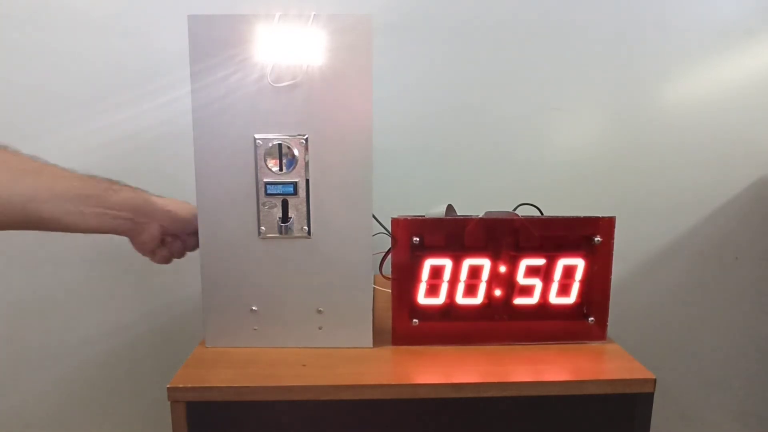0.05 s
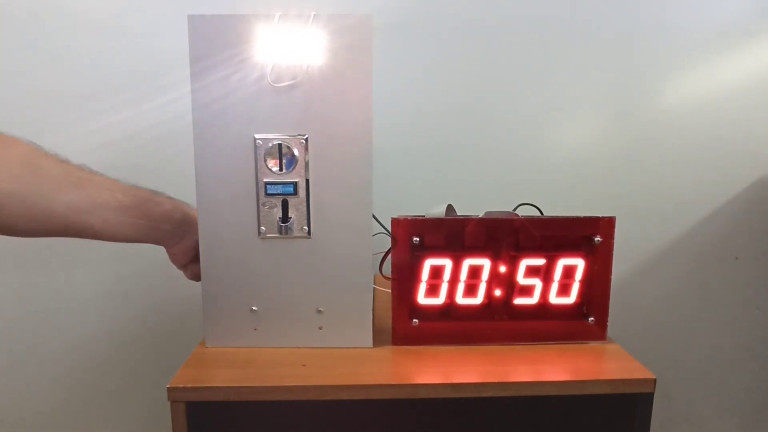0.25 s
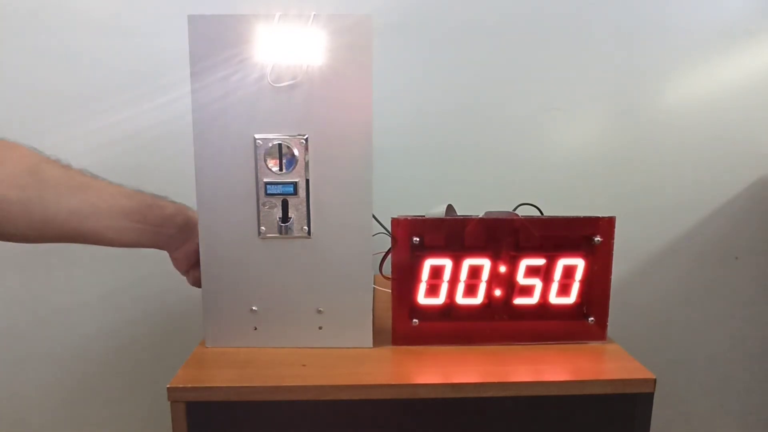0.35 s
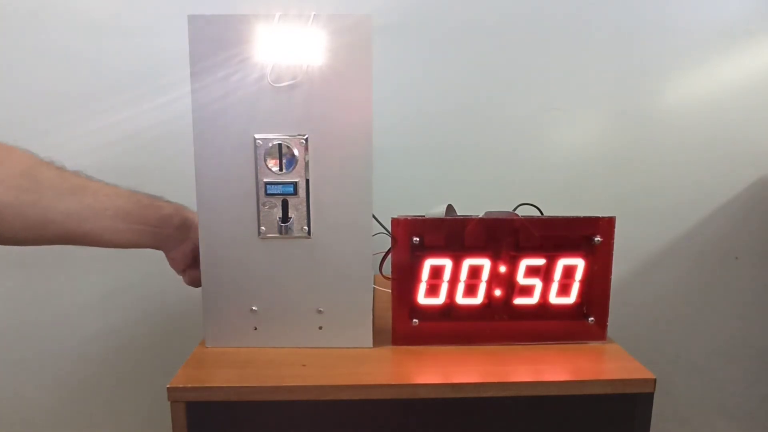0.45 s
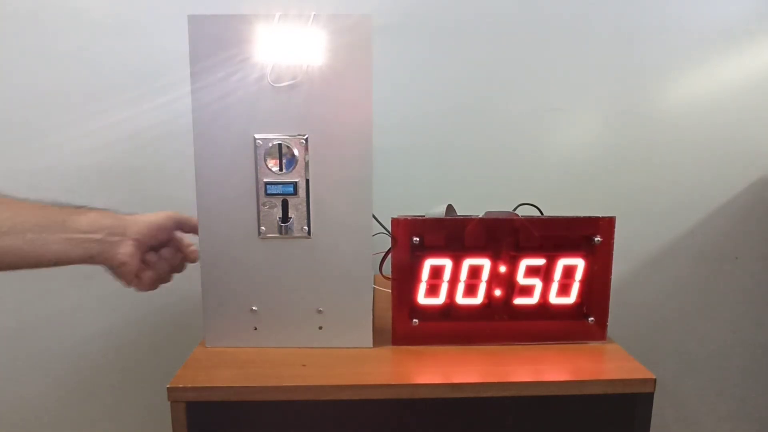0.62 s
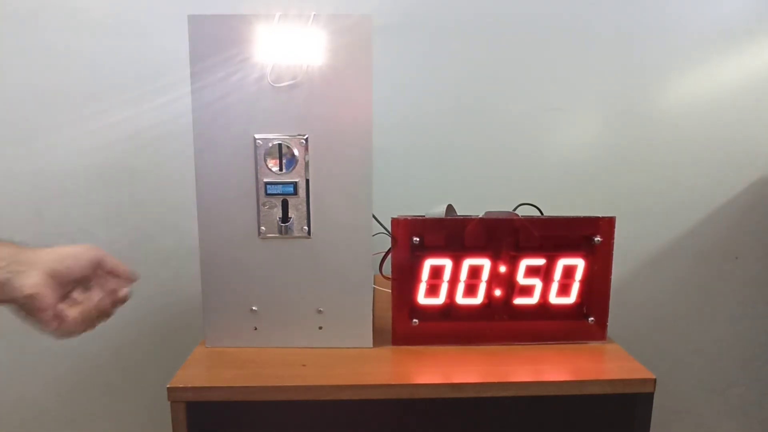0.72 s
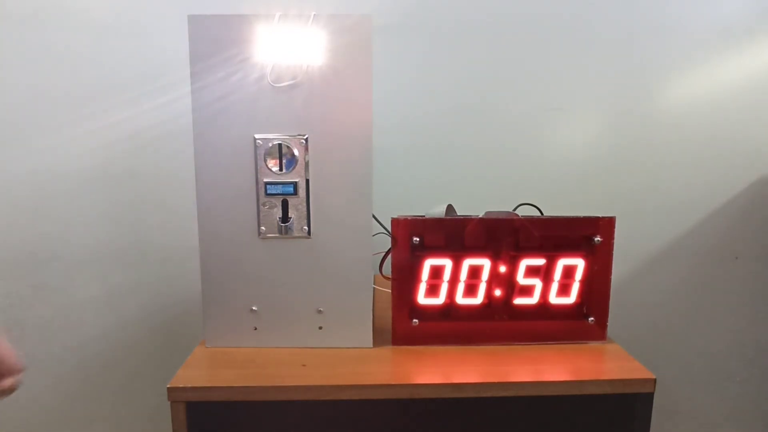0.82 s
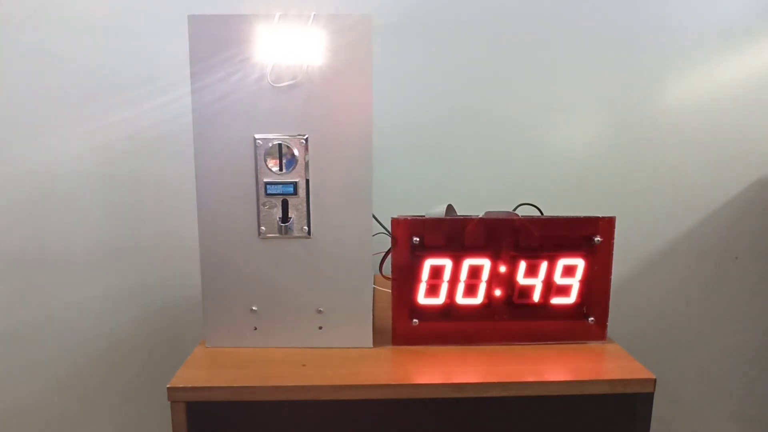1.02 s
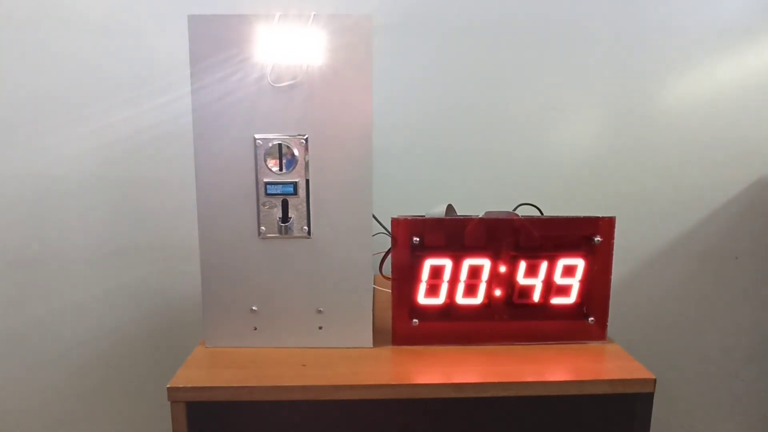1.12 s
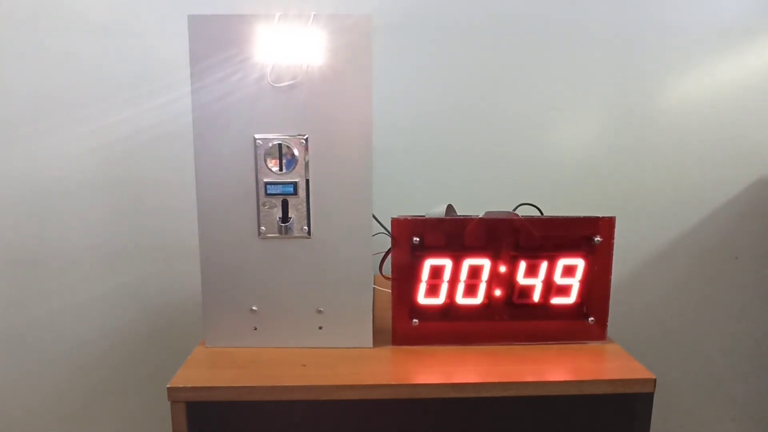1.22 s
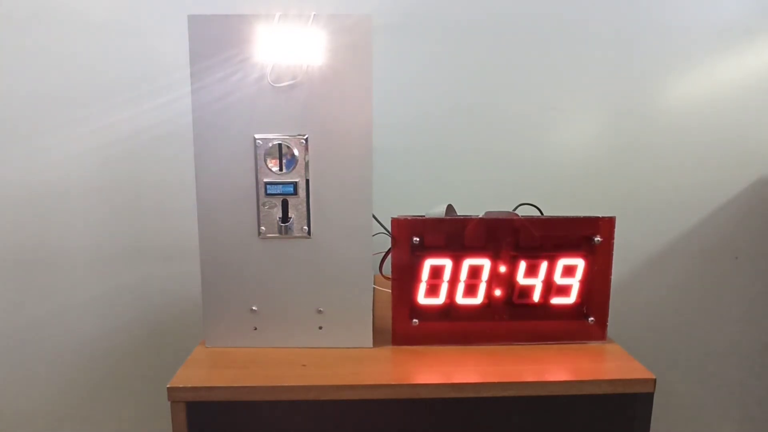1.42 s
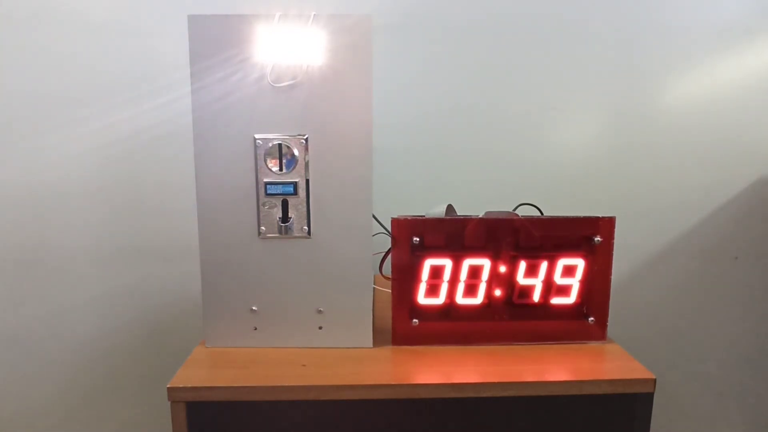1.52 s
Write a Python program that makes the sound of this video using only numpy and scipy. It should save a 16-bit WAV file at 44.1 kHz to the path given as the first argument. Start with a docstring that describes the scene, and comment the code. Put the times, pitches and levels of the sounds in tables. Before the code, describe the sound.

Two rattling bumps on a coin machine's metal panel, followed by clicks over ventilation hum.

```python
"""Ventilation rumble, hum and hiss fill a small hard room throughout.
At 0.24 s and 0.38 s a hand bumps a coin machine's sheet-metal panel: it booms, loose parts rattle,
and it ticks as the hand leaves. Near 1 s the coin mechanism gives one sharp click, ringing its body
and two small steel parts; light ticks and faint sliding follow.
The microphone is nearly deaf around 10 kHz."""
import sys
import numpy as np
from scipy import signal
from scipy.fft import rfft, irfft
from scipy.io import wavfile

SR = 44100
rng = np.random.default_rng(int(sys.argv[2]) if len(sys.argv) > 2 else 0)


def write(x):
    x = np.atleast_2d(x).T
    wavfile.write(sys.argv[1], SR, np.round(np.clip(x, -1, 1) * 32767).astype(np.int16))


N = 68355
T = np.arange(N) / SR
HZ = np.maximum(np.arange(N // 2 + 1) * SR / N, 1)


def from_db(db):
    """Decibels to gain."""
    return 10 ** (np.asarray(db) / 20)


def at_hz(points, hz):
    """Table lookup on a log-frequency axis."""
    points_hz, values = np.transpose(points)
    return np.interp(np.log(hz), np.log(points_hz), values)


def unit_energy(x):
    """Energy 1 per channel."""
    return x / np.sqrt(np.sum(x ** 2, axis=-1, keepdims=True) + 1e-20)


def decay(t60_s):
    """Exponential envelope."""
    return from_db(-60 * T / t60_s)


def impulses(t_s, db):
    """One impulse per event."""
    out = np.zeros(N)
    np.add.at(out, np.clip((np.asarray(t_s) * SR).astype(int), 0, N - 1), from_db(db))
    return out


def convolve(x, response):
    """Signal through an impulse response."""
    return signal.fftconvolve(np.atleast_2d(x), np.atleast_2d(response), axes=-1)[:, :N]


def butter(x, order, hz, kind):
    """Butterworth filter."""
    return signal.sosfilt(signal.butter(order, hz, kind, fs=SR, output="sos"), x + 1e-18)


def ring(modes):
    """Impulse response of damped modes, signs alternating."""
    return sum((-1) ** k * from_db(db) * decay(t60_s) * np.sin(2 * np.pi * hz * T)
               for k, (hz, db, t60_s) in enumerate(modes))


# Sound field: f/Hz, left-right correlation
COHERENCE = [(100, .98), (250, 0.91), (500, 0.63), (1000, 0.1), (2500, 0.096), (6000, 0.02)]
def noise(spectrum):
    """Coloured stereo noise, rms 1, alike in both ears in the bass."""
    mid, side = rfft(rng.standard_normal((2, N)))
    alike = at_hz(COHERENCE, HZ)
    ears = np.sqrt(1 + alike) * mid + np.sqrt(1 - alike) * side * np.array([[1], [-1]])
    return np.sqrt(N) * unit_energy(irfft(ears * from_db(at_hz(spectrum, HZ)), N))


# Air rumble: f/Hz, relative density/dB
RUMBLE_SPECTRUM = [(20, -27), (40, -28), (62, -2), (85, 0.5), (125, -9), (200, -5), (310, -12.5), (400, -8),
                   (520, -19), (680, -16.5), (1050, -27.5), (2200, -32.5), (8000, -45), (12000, -73)]
# Hiss: f/Hz, relative density/dB
HISS_SPECTRUM = [(2000, -26.5), (4200, 5), (5300, -17.5), (7000, 6.5), (8400, -4.5), (10000, 0),
                 (12300, -2.5), (16000, -3.5)]
# Hum: f/Hz, level/dB
HUM_TONES = [(72, -61.5), (247.6, -62), (382.2, -59.5), (489.9, -68.5), (662.1, -71)]
def ventilation(rumble_db=-51.5, hiss_db=-68.5, waver_depth=0.19, waver_hz=2.4):
    """Steady rumble and hiss; hum tones waver in level and phase."""
    out = from_db(rumble_db) * noise(RUMBLE_SPECTRUM) + from_db(hiss_db) * noise(HISS_SPECTRUM)
    for hz, db in HUM_TONES:
        slow = irfft(rfft(rng.standard_normal((2, N))) / (1 + (HZ / waver_hz) ** 2), N)
        swell, drift = waver_depth * np.sqrt(N) * unit_energy(slow)
        phase = 2 * np.pi * (hz * T + rng.random())
        out += from_db(db) * ((1 + swell) * np.sin(phase) + drift * np.cos(phase))
    return out


# Blows within the two bumps: t/s, boom/dB, thump/dB, thump f/Hz, clatter/dB, cutoff/Hz, contact/dB
PANEL_BLOWS = [(0.2400, -29, -17.5, 955, 0.5, 2570, -10), (0.2476, -34.5, -20, 589, -2.5, 1540, -32.5),
               (0.2529, -34, -23.5, 953, -2.5, 3000, -27), (0.3068, -37.5, -42, 604, -7.5, 1620, -18),
               (0.3470, -40.5, -29.5, 162, -23, 1200, -26.5), (0.3845, -34.5, -17.5, 479, -4.5, 890, -15),
               (0.3933, -30, -14, 546, -1.5, 820, -14)]
# Sheet's low modes: f/Hz, level/dB, t60/s
PANEL_MODES = [(98.8, -21, 0.38), (135.6, -11.5, 0.24), (171.5, -6.5, 0.59), (257.4, -1, 0.15),
               (288.5, -2.5, 0.42), (392, -19.5, 0.17), (411.5, -3.5, 0.4), (531.6, 6, 0.1),
               (676.7, -15.5, 0.089), (724.6, -8, 0.15), (914, -6.5, 0.14), (996, -6, 0.17),
               (1359, -9, .22), (1516, -6, 0.082)]
# Sheet's dense short modes: f/Hz, relative density/dB
CLATTER_SPECTRUM = [(70, -42), (140, -8), (250, -6), (450, 0), (700, 0.5), (1000, 2.5), (1500, -9),
                    (2200, -10), (4000, -8.5), (8000, -51.5)]
def panel(thump_t60_s=0.024, clatter_t60_s=0.069):
    """Each blow makes hard contact; its low-passed push drives the sheet's boom, thump and clatter."""
    boom, clatter, hits = 0, 0, 0
    sheet = ring(PANEL_MODES)
    for t_s, boom_db, thump_db, thump_hz, clatter_db, cutoff_hz, contact_db in PANEL_BLOWS:
        push = butter(impulses(t_s, 0), 2, cutoff_hz, "low")
        thump = ring([(thump_hz, thump_db, thump_t60_s)])
        boom += convolve(push, from_db(boom_db) * sheet + thump)
        short_modes = unit_energy(noise(CLATTER_SPECTRUM) * decay(clatter_t60_s))
        clatter += from_db(clatter_db) * convolve(push, short_modes)
        hits += impulses(t_s, contact_db)
    knock = clatter + contacts(hits + rattle()) + release_tick()
    return boom + room(boom, early_db=-9.5, tail_db=-9.5) + knock + room(knock, early_db=-7.5, tail_db=-4)


# Hard contact: f/Hz, relative density/dB
CONTACT_SPECTRUM = [(500, -10), (1500, 5), (3000, -2.5), (4300, 3.5), (5300, -8), (7000, 8), (8300, -5.5),
                    (10000, -41.5), (13000, -14.5), (16000, -23)]
def contacts(hits, t60_s=0.029):
    """One bright noise burst per hit; overlaps add in power."""
    power = convolve(hits ** 2, unit_energy(decay(t60_s)) ** 2)
    return np.sqrt(np.abs(power)) * noise(CONTACT_SPECTRUM)


def rattle(hits_per_s=400, level_db=-28.5, spread_db=1, end_s=0.41, release_s=0.033):
    """Loose parts hit at random from the first blow on, then settle."""
    shaking = (T > PANEL_BLOWS[0][0]) * np.exp(-np.maximum(T - end_s, 0) / release_s)
    sizes = from_db(level_db + spread_db * rng.standard_normal(N))
    return shaking * sizes * (rng.random(N) < hits_per_s / SR)


# Reverberation: f/Hz, t60/s
ROOM_DECAY = [(150, 0.97), (500, 0.64), (2000, 0.63), (7000, 0.56), (14000, 0.28)]
def room(x, early_db, tail_db, gap_s=0.0028, early_t60_s=0.12):
    """Quick reflections off near walls, and a tail that dies band by band."""
    white = [(20, 0), (20000, 0)]
    bands_hz = np.geomspace(125, 16000, 8)
    diffuse = rfft(noise(white))
    tail = 0
    for hz, selector in zip(bands_hz, np.eye(len(bands_hz))):
        share = np.interp(np.log(HZ), np.log(bands_hz), selector)
        tail += irfft(diffuse * share, N) * decay(at_hz(ROOM_DECAY, hz))
    arrived = T > gap_s
    early = unit_energy(noise(white) * decay(early_t60_s) * arrived)
    return convolve(x, from_db(early_db) * early + from_db(tail_db) * unit_energy(tail * arrived))


def release_tick(t_s=0.5998, level_db=-47.5, hz=4630, t60_s=0.0067):
    """The panel ticks as the hand leaves."""
    return convolve(impulses(t_s, level_db), ring([(hz, 0, t60_s)]))


FAR_EAR_LAG_S = 0.00029
# Clicks: t/s, body/dB, low steel/dB, high steel/dB, left minus right/dB
MECHANISM_CLICKS = [(0.8685, -54, -73, -69, 5), (0.9693, -18.5, -18.5, -24, 8.5),
                    (1.0890, -43.5, -65, -69, 13), (1.138, -39, -70, -74, 11.5),
                    (1.2016, -50, -70, -76, 17), (1.2705, -63, -87, -81, 12),
                    (1.3303, -36.5, -66, -49.5, 16.5), (1.3404, -57, -66, -47.5, -12),
                    (1.348, -51, -76, -58, 7), (1.3846, -40, -66, -56.5, 21), (1.4020, -53, -65, -54, 3)]
# Mechanism body: f/Hz, level/dB, t60/s
BODY_MODES = [(4360, -12, 0.0063), (5830, -9.5, 0.0037), (6180, -11, 0.012), (6470, -6.5, 0.0078),
              (7350, -5, 0.0066), (8500, -12, 0.0036), (10020, -15, 0.0089), (11800, -13.5, 0.0018),
              (15100, -13, 0.0039)]
def mechanism(radiation_cutoff_hz=3740):
    """Clicks, mostly on the left, ring the body and two steel parts, all too small to radiate lows."""
    t_s, body_db, low_db, high_db, pan_db = np.transpose(MECHANISM_CLICKS)
    body = ring(BODY_MODES)
    parts = [(body_db, body),
             (low_db, steel_ping(hz=13060, t60_s=0.013)),
             (high_db, -steel_ping(hz=14030, t60_s=0.032))]
    scratch = sliding(body)

    def pickup(lag_s, side_db):
        """The mechanism at one listening point."""
        clicks = sum(convolve(impulses(t_s + lag_s, db + side_db), part) for db, part in parts)
        return butter(clicks + scratch, 4, radiation_cutoff_hz, "high")
    direct = np.vstack([pickup(0, pan_db / 2), pickup(FAR_EAR_LAG_S, -pan_db / 2)])
    return direct + room(pickup(0, 0), early_db=-2.5, tail_db=-3.5)


def steel_ping(hz, t60_s, after_db=-29, after_t60_s=0.2):
    """A small steel part pings, is quickly damped and rings on faintly."""
    return ring([(hz, 0, t60_s)]) + ring([(hz, after_db, after_t60_s)])


def latch(level_db=-11.5, band_hz=(2230, 4800)):
    """Dry snap under the loudest click, lower than the ringing parts."""
    t_s, *_, pan_db = max(MECHANISM_CLICKS, key=lambda click: click[1])
    pulses = np.array([impulses(t_s, level_db + pan_db / 2),
                       impulses(t_s + FAR_EAR_LAG_S, level_db - pan_db / 2),
                       impulses(t_s, level_db)])
    left, right, centre = butter(pulses, 4, band_hz, "band")
    return np.array([left, right]) + room(centre, early_db=-3, tail_db=-5.5)


# Sliding parts: t/s, length/s, grain level/dB
PART_SLIDES = [(1.124, .05, -59.5), (1.324, .075, -52), (1.533, .03, -56)]
def sliding(body, grains_per_s=850):
    """Sliding parts scratch the mechanism's body in random grains."""
    envelope = sum(from_db(db) * (T > t_s) * (T < t_s + length_s) for t_s, length_s, db in PART_SLIDES)
    grains = rng.standard_normal(N) * (rng.random(N) < grains_per_s / SR)
    return convolve(envelope * grains, body)


def scene():
    """Coin machine over the ventilation."""
    return panel() + mechanism() + latch() + ventilation()


def record(dry):
    """Microphone: bass cut, leaky notch around 10 kHz, steep top cut."""
    low_cut_hz, top_cut_hz = 55, 16400
    notch_hz, leak_db = (8400, 11750), -20.5
    thin = butter(dry, 4, low_cut_hz, "high")
    notched = butter(thin, 6, notch_hz, "bandstop") + from_db(leak_db) * thin
    return signal.sosfilt(signal.cheby2(16, 60, top_cut_hz, fs=SR, output="sos"), notched)


dry = scene()
out = record(dry)
write(out)
```